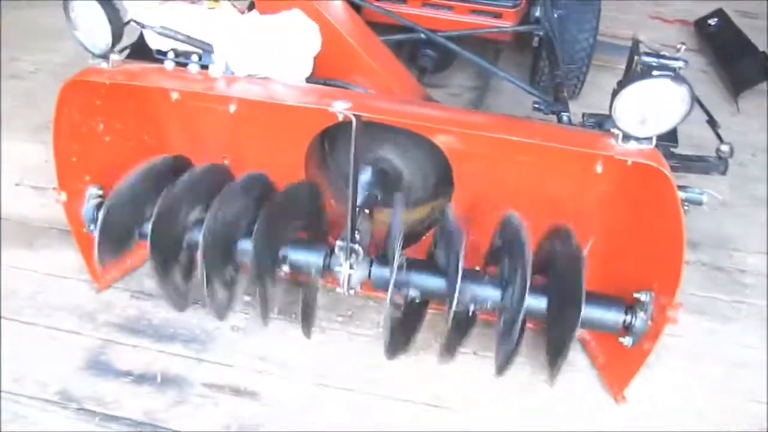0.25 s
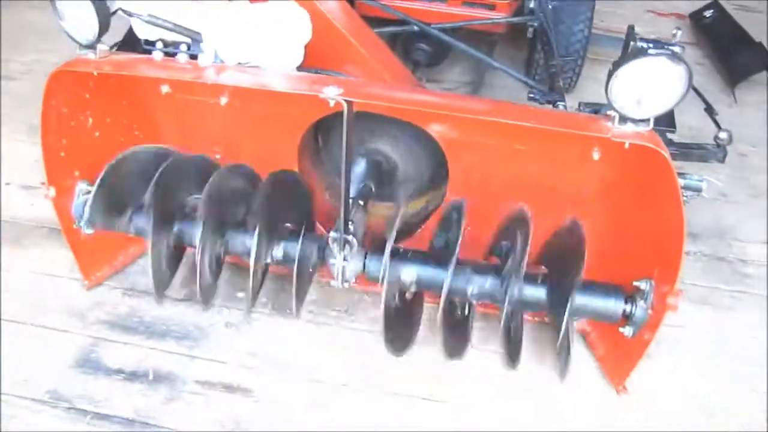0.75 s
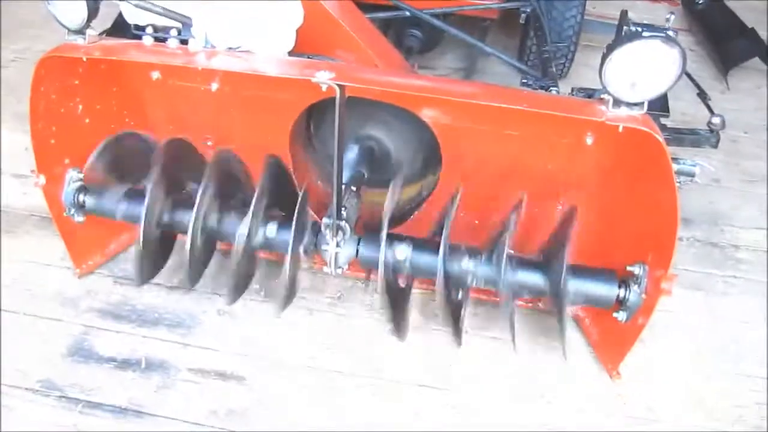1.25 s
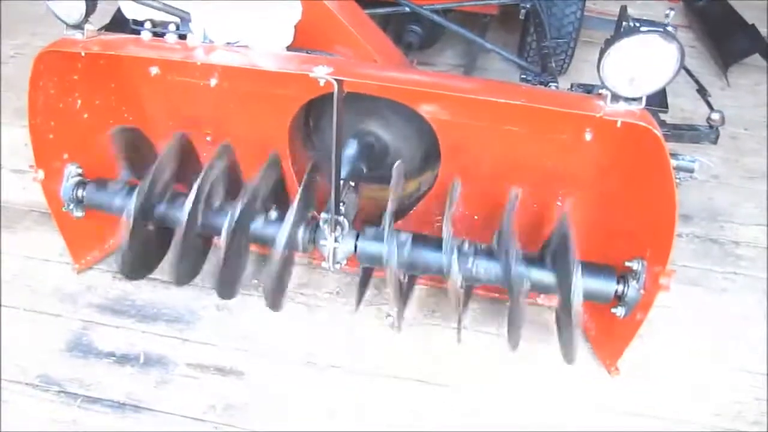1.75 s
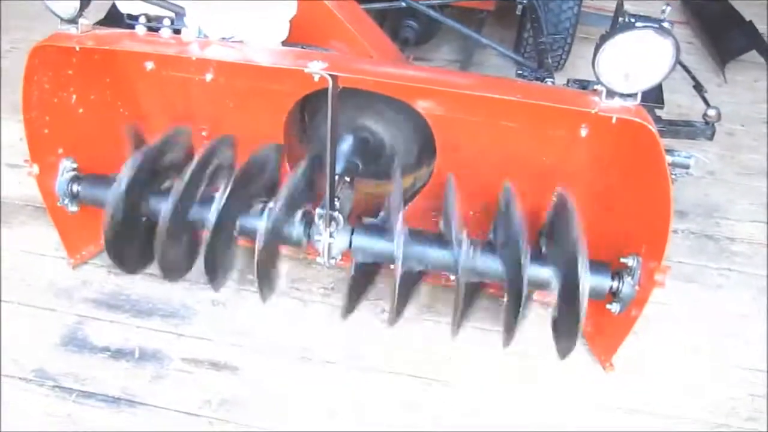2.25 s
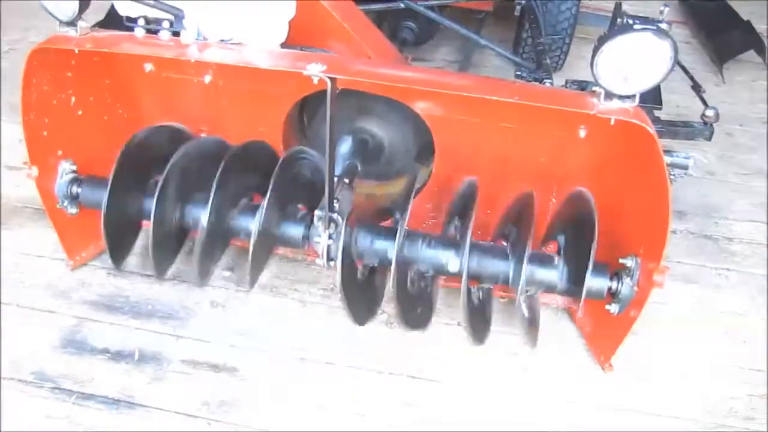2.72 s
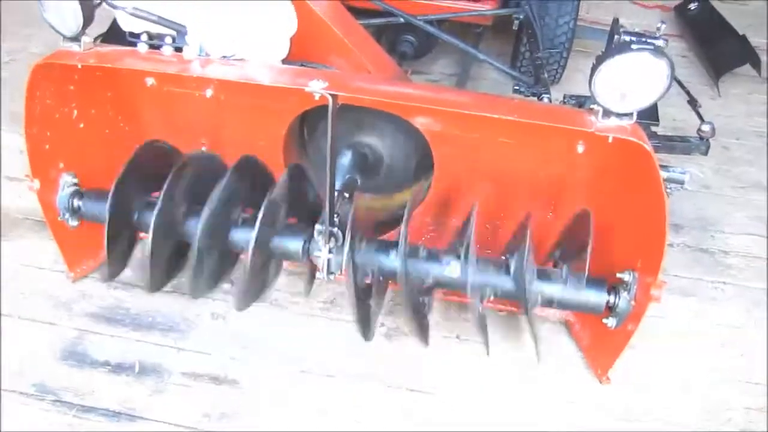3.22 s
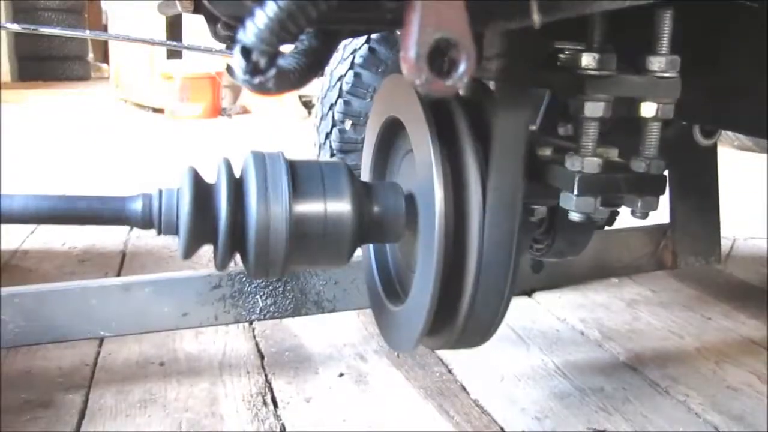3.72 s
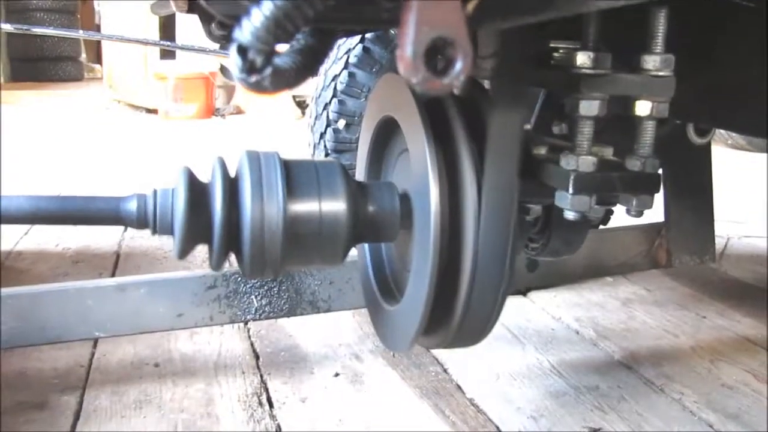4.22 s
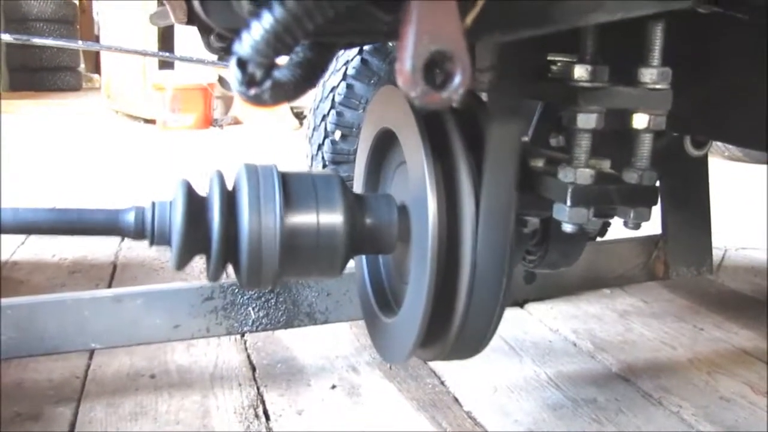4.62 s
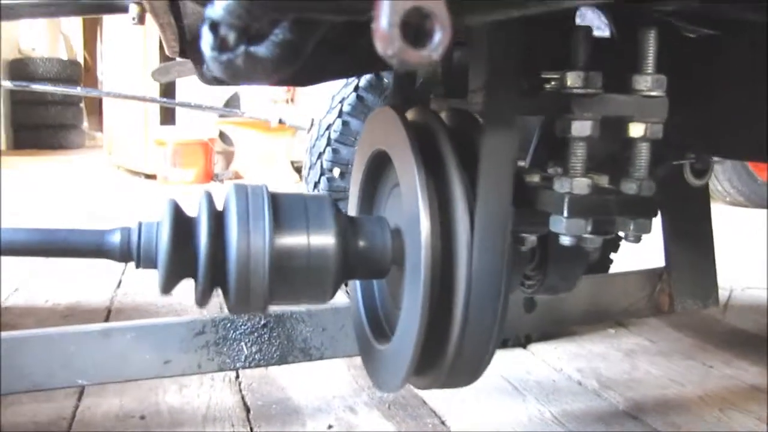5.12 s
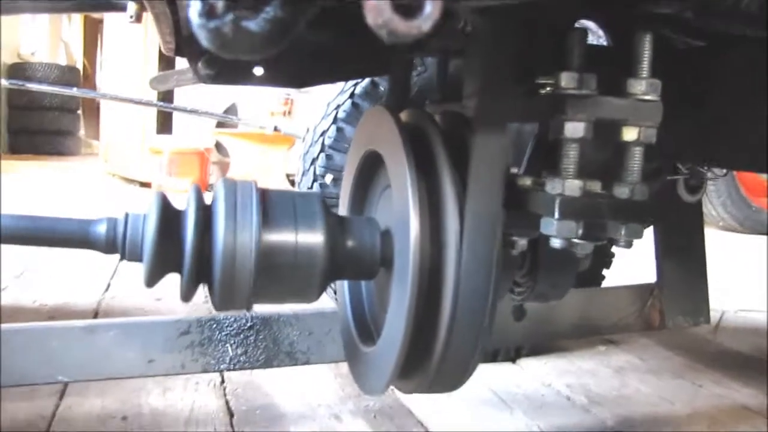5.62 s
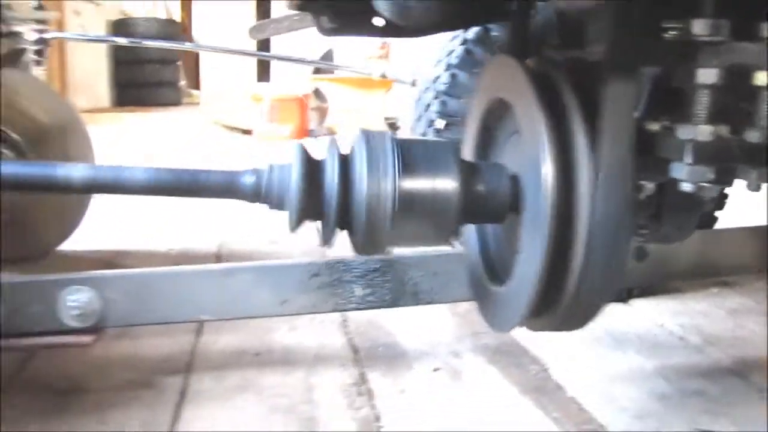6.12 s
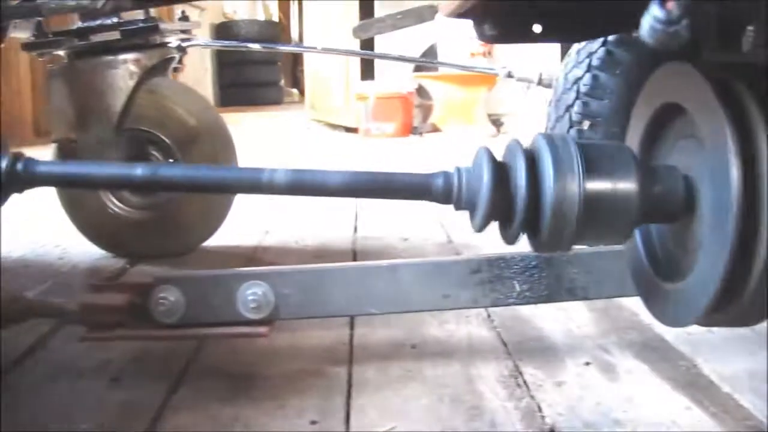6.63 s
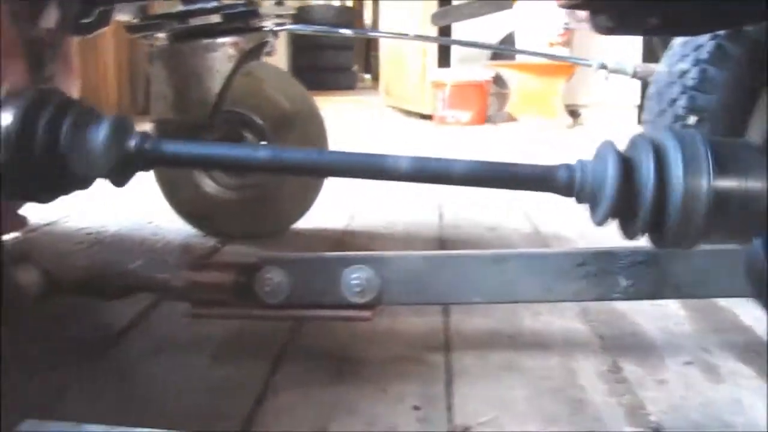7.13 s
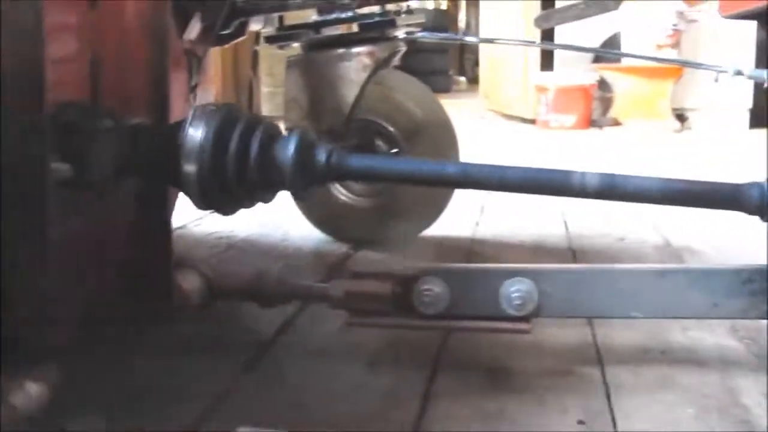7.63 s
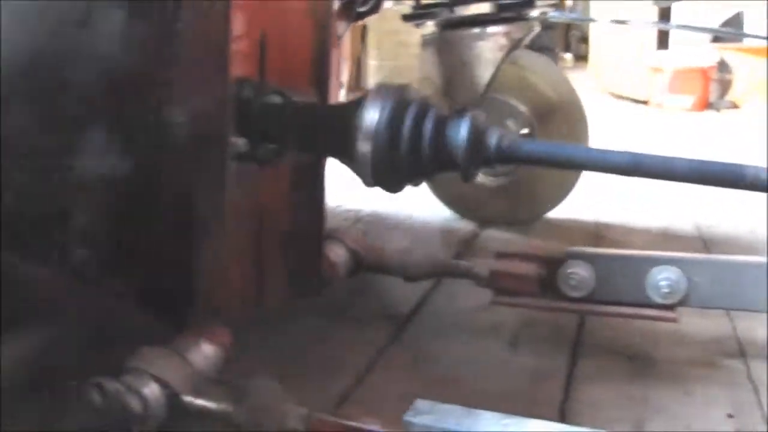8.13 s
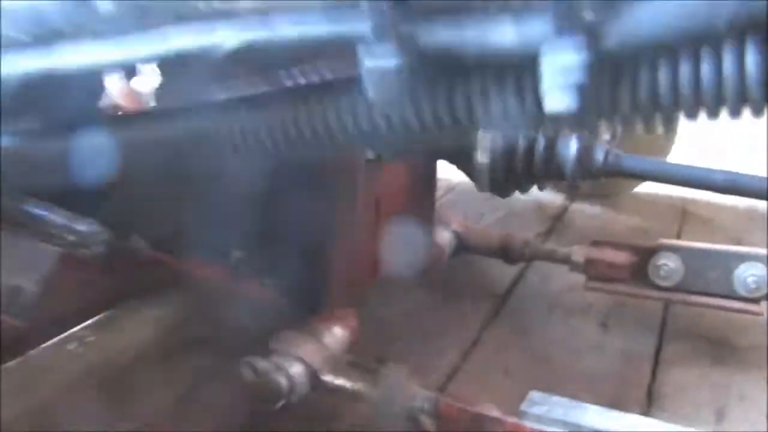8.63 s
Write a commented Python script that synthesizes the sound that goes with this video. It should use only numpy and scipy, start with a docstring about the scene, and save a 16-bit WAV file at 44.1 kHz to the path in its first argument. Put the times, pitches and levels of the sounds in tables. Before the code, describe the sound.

From 0 s, a small twin-cylinder tractor engine runs fast and steady in a shed, heard from in front of a snowblower. Low buzzing exhaust and impeller hum mix with rushing air, loose metal rattle and faint whine. The auger clanks and scrapes roughly four or five times a second, with harder drops near 0.1, 0.7 and 2.2 s. Everything fades from the start, stopping near 3.15 s. After a brief silence, at about 3.3 s, close sound from under the frame fades in, rising until about 6.7 s: heavier exhaust thud, airy rush, clatter, ticking valves, rapid high belt chirps and a fan whine near 2 kHz. The whine swells around 4, 5.8 and 7.5 s, wandering from left to right. From 6 to 8 s the microphone creeps from pulley to shaft joint; belt chirps weaken and housing rattle grows. The engine is still running at the end, about 9 s.

```python
"""A twin-cylinder garden tractor engine in a shed drives a snowblower through a belt and shaft.
Firing pulses ring a muffler; impeller and fan tones follow the crank; shaped noise gives air, rattle and knocks.
In front, the slow auger clanks on every turn, and the sound fades steadily from the start.
After a moment of silence the sound under the frame fades in, with strong exhaust thud, belt chirp and fan whine."""
import sys
import numpy as np
from scipy import signal
from scipy.fft import rfft, irfft, next_fast_len
from scipy.io import wavfile
from scipy.ndimage import uniform_filter1d, map_coordinates

SR = 44100
rng = np.random.default_rng(int(sys.argv[2]) if len(sys.argv) > 2 else 0)


def log_audio(samples):
    """Write samples as a 16-bit WAV file to the path given in sys.argv[1]."""
    # one column per channel
    frames = np.atleast_2d(samples).T
    # limit to full scale, then quantise
    limited = np.clip(frames, -1, 1)
    pcm = np.round(limited * 32767).astype(np.int16)
    wavfile.write(sys.argv[1], SR, pcm)


N = 390726
T = np.arange(N) / SR  # time (s)

BELT_RATIO = .8185  # shaft turns per crank turn
WORM_RATIO = 10  # shaft turns per auger turn
BELT_LAPS = .406  # belt laps per crank turn
FRONT_SET_HZ, UNDER_SET_HZ = 46.413, 46.432  # crank speed outside the surges (turns/s)
WHINE_ORDER, FRONT_WHINE_DB = 42, -60  # strongest fan tone: multiple of crank speed, relative level in front
FRONT_SLOPE_DB_PER_S = 0.77  # slows the fall of the front fade
HARD_CLANK_S = .25  # about one auger turn
# straight ramps; the first is cut short and the second starts late, which leaves a silence
FADE_OUT_END_S, FADE_OUT_CUT_S = 3.363, 3.154
FADE_IN_START_S, FADE_IN_S, FADE_IN_CUT_S = 3.287, 3.39, 3.319
TOP_HZ = 15750  # upper band limit

# muffler response in front, beside the pulley and beside the shaft joint: [f/Hz, level/dB]
FRONT_PIPE = [(20, -46), (46, -21), (93, -19.5), (140, 2.5), (186, -9.5), (233, -12.5), (280, -11.5),
              (326, -26), (380, -21), (520, -20.5), (800, -32), (1500, -34.5), (3000, -55)]
PULLEY_PIPE = [(20, -73), (46, -17), (93, -21), (140, 1.5), (186, -7), (233, -12), (280, -14.5), (326, -15),
               (375, -11), (430, -17), (470, -17), (530, -28.5), (1500, -46), (3000, -50)]
JOINT_PIPE = [(20, -58), (46, -24.5), (93, -15.5), (140, 1), (186, -6), (233, -11.5), (280, -7),
              (326, -20.5), (420, -22.5), (600, -24.5), (750, -37), (1500, -31), (3000, -64)]
# three-bladed impeller: [multiple of shaft speed, front level/dB, under-frame level/dB]
IMPELLER = [(1, -11.5, -17), (2, -13.5, -16.5), (3, 0, 0.5), (5, -0.5, -16), (6, -2, -14.5), (9, -8, -15.5),
            (12, -23.5, -20), (15, -18, -28)]
# noise colour of air rush, engine clatter and valve ticks: [f/Hz, relative level/dB]
FRONT_RUSH = [(20, -22.5), (35, -13), (65, -9), (110, -1), (160, 9.5), (300, -1), (600, 3.5), (900, -3.5),
              (1350, 1), (1700, -1.5), (2050, 0), (2600, -7), (5000, -39)]
UNDER_RUSH = [(20, -9), (35, -2), (65, 3.5), (110, 8.5), (160, 7.5), (280, 3), (600, 0.5), (850, 0.5),
              (1100, -1.5), (1350, 0), (1900, -3), (2600, -9), (5000, -34.5)]
FRONT_CLATTER = [(600, -41), (1800, -9.5), (2700, 0), (3600, -4), (5000, -10.5), (6200, -10), (8000, -19.5),
                 (11000, -24.5), (15500, -42)]
UNDER_CLATTER = [(600, -19), (1800, -9.5), (2500, -0.5), (3600, 0), (4400, -1.5), (5300, -6), (6500, -8),
                 (8000, -14), (11000, -18.5), (15500, -39)]
FRONT_VALVE = [(4000, -39), (6000, -8), (7000, 6.5), (8000, 4.5), (8800, -1), (9700, -1), (11500, -11.5),
               (13000, -13), (15500, -25)]
UNDER_VALVE = [(4000, -23), (6000, 1), (7100, 1.5), (9000, -1), (10500, 0), (11800, -5), (13000, -10),
               (15500, -26)]
# bursts within each crank turn: [place in the turn 0-1, rise time/turns, strength]
FRONT_TICKS = [(0.2, 0.033, 0.85), (0.93, 0.078, 0.18), (0.4, .08, 0.116)]
UNDER_TICKS = [(.12, 0.17, 1), (.8, 0.11, 1)]
FRONT_PUFF = [(.07, 0.03, 0.78)]
UNDER_PUFF = [(0.064, 0.057, 0.38)]
# scrapes within each auger turn: [place in the turn 0-1, f/Hz, width scale/octaves, level/dB, decay/s]
FRONT_KNOCKS = [(.26, 5360, 0.38, -51.5, 0.026), (.92, 4200, 0.56, -50.5, 0.021),
                (0.96, 6050, 0.097, -52.5, 0.027), (.05, 3000, 0.67, -46, 0.0092)]
UNDER_KNOCKS = [(.84, 4600, .15, -53.5, 0.011), (.94, 4500, 0.24, -52, 0.0091)]
# stereo spread of the noises: [f/Hz, side-to-mid level/dB]
FRONT_SIDE = [(60, -1), (380, -20), (950, -18), (2380, -8.5), (6000, -5), (15000, -1.5)]
UNDER_SIDE = [(60, -16), (150, -7.5), (380, -11), (950, -10), (2380, -1), (6000, 1.5), (15000, -0.5)]
# the listening point creeps from pulley to joint: [t/s, share of the way 0-1]
WALK = [(5.8, 0), (6.7, 0.38), (7.4, 0.76), (8.2, 0.99)]
# modes of the blower housing, the auger flights and the engine block: [f/Hz, width/Hz, level/dB]
HOUSING = [(580, 53, 7.5), (1380, 77, -7), (2400, 230, -0.5), (2640, 240, -2), (3270, 250, -4.5),
           (4650, 120, -10)]
FLIGHTS = [(640, 160, -5), (1360, 300, -1), (2600, 81, 1), (2880, 81, 2), (3160, 140, -2.5),
           (3210, 110, -1), (3740, 180, -4.5), (4580, 220, -6.5), (6100, 520, -12)]
BLOCK = [(1300, 200, 4), (1650, 440, 3), (3250, 500, -14)]
# belt chirp: [t/s, f/Hz, level/dB]
BELT = [(3.4, 5930, -56), (4.3, 5950, -55.5), (5.8, 5840, -63), (6.3, 6070, -54.5), (7, 6370, -59.5),
        (7.5, 6440, -67)]
# worn spots on the belt: [place in the lap 0-1, rise time/laps, strength]
BELT_SPOTS = [(0, 0.04, 1), (.37, 0.064, 0.56)]
# smooth departures from the set speed: [middle t/s, length/s, extra speed/(turns per s)]
FRONT_SURGES = [(1.357, 1.677, .167), (2.791, .979, .23)]
UNDER_SURGES = [(4.142, 2.211, .24), (5.777, 1.422, .511), (7.711, 1.887, .546), (8.469, .666, -.18)]
# relative level of each part: [front level/dB, pulley level/dB, joint level/dB]
EXHAUST_DB = (-44.4, -33, -33)
IMPELLER_DB = (-53.5, -38.5, -38)
RUSH_DB = (-47, -41, -41.5)
CLATTER_DB = (-53, -48.5, -51.5)
VALVE_DB = (-63.5, -56, -58.5)
# swaying toward and away from the engine, under the frame: [t/s, added level/dB]
CLOSENESS = [(3.5, 1.1), (6.1, -1), (7.6, 0.7), (8.8, -.6)]
# fan tones: [multiple of crank speed, front level/dB, pulley level/dB, joint level/dB,
#             level change/dB per extra turn/s, left-right level/dB]
FAN_TONES = [(20, -64, -57.5, -55.5, 2, 4), (38, -68, -55.5, -59.5, 8.5, -4), (40, -68, -53, -59, -15, 3),
             (46, -64.5, -57.5, -61, 10.5, -13)]
# loud spots of the fan's standing waves, passed under the frame:
# [middle t/s, length/s, multiple of crank speed, level/dB, left-right level/dB, lag between ports/rad]
LOUD_SPOTS = [(4.1, 3.1, 42, -47.5, 16, 0.76), (5.75, 2.1, 42, -43.5, 4.5, 2.4),
              (6.701, 1.6, 42, -51.5, 0, 2.15), (7.316, 1.03, 42, -44, 0, .6),
              (7.4, 2.4, 20, -54.5, 0, 0.45), (7.72, 0.91, 42, -42.5, -18, 1.1),
              (8.85, 0.75, 42, -51.5, -12, .9)]
# harder drops of the auger: [t/s, extra level/dB]
HARD_CLANKS = [(.14, 6), (.66, 2), (2.24, 4)]


def amp(db):
    """Level: decibels converted to an amplitude ratio."""
    return 10 ** (np.asarray(db) / 20)


def unit(x):
    """Normalisation: the signal scaled to rms 1."""
    return x / np.sqrt(np.mean(x ** 2) + 1e-20)


def along(points, hz):
    """Interpolation of (f/Hz, value) points on a logarithmic frequency axis."""
    f, v = np.transpose(points)
    return np.interp(np.log(hz + 1), np.log(f + 1), v)


def curves(rows):
    """Linear interpolation in time: one curve for each column after t/s."""
    s, *cols = np.transpose(rows)
    return [np.interp(T, s, c) for c in cols]


def wobble(rate):
    """Slow random modulation: a smooth curve through rate random knots a second."""
    knots = rng.standard_normal(int(N * rate / SR) + 4)
    return map_coordinates(knots, [T * rate])


def swell(middle, length):
    """Raised-cosine envelope: one smooth rise and fall, 0 to 1 to 0."""
    return np.cos(np.pi * np.clip((T - middle) / length, -.5, .5)) ** 2


def filtered(x, response):
    """Linear filtering: the spectrum multiplied by a response of frequency."""
    m = next_fast_len(N + SR // 2)
    spectrum = rfft(x, m) * response(np.fft.rfftfreq(m, 1 / SR))
    return irfft(spectrum, m)[..., :N]


def ringing(spectrum_db, size=8192):
    """Minimum phase: the causal impulse response with this magnitude, by folding the cepstrum."""
    magnitude = amp(along(spectrum_db, np.fft.rfftfreq(size, 1 / SR)))
    cepstrum = irfft(np.log(magnitude))
    cepstrum[1:size // 2] *= 2
    cepstrum[size // 2 + 1:] = 0
    return irfft(np.exp(rfft(cepstrum)))


def resonances(modes):
    """Modal summation: the colour in dB of several damped resonances, added in power."""
    def colour_db(f):
        power = 0
        for hz, width, db in modes:
            detuning = (f * f - hz * hz) / ((f + 1) * width)
            power = power + amp(db) ** 2 / (1 + detuning ** 2)
        return 10 * np.log10(power)
    return colour_db


def noise(colour_db, spread, gate=1):
    """Mid-side stereo: gated noise coloured by a function of frequency; its mid has rms 1."""
    def shape(hz):
        mid_db = colour_db(hz)
        return amp([mid_db, mid_db + along(spread, hz)])
    mid, side = filtered(gate * rng.standard_normal((2, N)), shape)
    return np.array([mid + side, mid - side]) / np.std(mid)


def scatter(turns, scatter_db):
    """Cycle-to-cycle variation: a new random gain for every whole turn."""
    index = np.floor(turns - np.floor(turns.min())).astype(int)
    return amp(scatter_db * rng.standard_normal(index.max() + 1))[index]


def bursts(turns, rows, scatter_db):
    """Cyclic excitation: quick rises with slower decays at fixed places in every turn."""
    out = 0
    for place, rise, strength in rows:
        age = (turns - place) % 1 / rise
        out = out + strength * scatter(turns - place, scatter_db) * age * np.exp(1 - age)
    return out


def blows(turns, place, decay):
    """Impact envelope: a fast onset and exponential decay once a turn, each a little different."""
    age_s = (turns - place) % 1 / np.gradient(turns) / SR
    strength = scatter(turns - place, scatter_db=1.3)
    return strength * np.exp(-age_s / decay) * (1 - np.exp(-age_s / .0008))


def placed(pan_db, lag):
    """Stereo cues: complex gain of a tone at two ports, from a level difference and phase lag."""
    sides = np.array([[.5], [-.5]])
    gains = amp(sides * pan_db)
    return gains / gains.mean() * np.exp(-1j * sides * lag)


def crank_rotation(set_hz, surges, start_turns):
    """Phase is the integral of speed: crank turns, and the speed above the set speed."""
    extra_hz = sum(size * swell(middle, length) for middle, length, size in surges)
    return start_turns + np.cumsum(set_hz + extra_hz) / SR, extra_hz


def exhaust(crank, pipe, place, scatter_db, uneven, chamber_hz=480):
    """Impulse excitation of a resonator: one firing a turn, cylinders alternating, rings the muffler."""
    firing = np.floor(crank - place)
    onsets = np.diff(firing, prepend=firing[0])
    cylinder = 1 + uneven * (-1) ** firing
    pulses = onsets * scatter(crank - place + .5, scatter_db) * cylinder
    thuds = signal.fftconvolve(pulses, ringing(pipe + [(8000, -120)]))[:N]
    # an all-pass chamber spreads each pulse in time, which rounds the thud
    return -unit(filtered(thuds, lambda f: (chamber_hz - 1j * f) / (chamber_hz + 1j * f)))


def impeller(shaft, levels_db, waver_db):
    """Blade-passing tones: a wavering harmonic series on the belt-driven shaft speed."""
    out = 0
    for row, db in zip(IMPELLER, levels_db):
        gain = amp(db + waver_db * wobble(7))
        out = out + gain * np.sin(2 * np.pi * (round(row[0]) * shaft + rng.random()))
    return np.sqrt(2) * out


def machinery(crank, spread, rush, clatter, valve, puff, ticks, gains_db, puff_depth, grain_db, tick_floor):
    """Periodically modulated noise: rushing air puffs, loose metal rattles and valves tick with the crank."""
    puffs = bursts(crank, puff, scatter_db=2.5)
    jolts = bursts(crank, ticks, scatter_db=4)
    clicks = bursts(crank, ticks, scatter_db=2)
    air = noise(lambda hz: along(rush, hz), spread, 1 + puff_depth * puffs)
    rattle_gate = amp(grain_db * wobble(450)) * (1 + 0.54 * jolts)
    rattle = noise(lambda hz: along(clatter, hz), spread, rattle_gate)
    tap_gate = amp(grain_db * wobble(900)) * (tick_floor + clicks)
    taps = noise(lambda hz: along(valve, hz), spread, tap_gate)
    return sum(amp(db) * layer for db, layer in zip(gains_db, (air, rattle, taps)))


def auger(shaft, knocks, spread):
    """Speed reduction: the worm gear turns the auger slowly, and it scrapes at fixed places in each turn."""
    out = np.zeros((2, N))
    for place, hz, octaves, db, decay in knocks:
        def colour_db(f):
            distance = np.log2((f + 1) / hz) / (2 * octaves)
            return -40 * np.log10(1 + distance ** 2)
        steel = noise(colour_db, spread)
        out += amp(db) * blows(shaft / WORM_RATIO, place, decay) * steel
    return out


def clank(shaft, place, level_db, decay, ragged_db=3):
    """Backlash impact: once a turn the auger drops through its play, chatters, and the flights ring."""
    chatter = unit(amp(ragged_db * wobble(130)))
    force_db = level_db + sum(db * swell(s, HARD_CLANK_S) for s, db in HARD_CLANKS)
    drop = blows(shaft / WORM_RATIO, place, decay)
    return amp(force_db) * drop * chatter * noise(resonances(FLIGHTS), FRONT_SIDE)


def reflections(x, depth_db):
    """Multipath interference: frame and floor shape the treble into slowly shifting peaks at each port."""
    hz, _, z = signal.stft(x, SR, nperseg=1024)
    field = uniform_filter1d(rng.standard_normal(z.shape), size=3, axis=1)  # smooth over frequency
    field = unit(uniform_filter1d(field, size=70, axis=2))  # smooth over time
    # full depth above 2 kHz, less below
    gain = amp(depth_db * np.clip(hz / 2000, 0, 1)[:, None] * field)
    # partly even out the mean power across frequency
    gain /= np.sqrt(np.mean(gain ** 2, axis=(0, 2), keepdims=True)) ** .5
    return signal.istft(z * gain, SR, nperseg=1024)[1][:, :N]


def whine(crank, order, ports, waver_db, flutter):
    """Order-locked tone: a fan tone follows the crank; reflections shift its strength at each port."""
    phase = 2 * np.pi * (round(order) * crank + rng.random())
    phase = phase + flutter * order / WHINE_ORDER * wobble(40)
    shifting = amp(waver_db * np.array([wobble(3.04), wobble(2.98)]))
    return np.sqrt(2) * shifting * np.imag(ports * np.exp(1j * phase))


def front():
    """Superposition in front: facing the auger, with the engine behind the housing."""
    crank, _ = crank_rotation(FRONT_SET_HZ, FRONT_SURGES, start_turns=.014)
    shaft = BELT_RATIO * crank
    hum = amp(EXHAUST_DB[0]) * exhaust(crank, FRONT_PIPE, place=0.058, scatter_db=1.0, uneven=.03)
    hum += amp(IMPELLER_DB[0]) * impeller(shaft, [row[1] for row in IMPELLER], waver_db=2.0)
    works = machinery(crank, FRONT_SIDE, FRONT_RUSH, FRONT_CLATTER, FRONT_VALVE, FRONT_PUFF, FRONT_TICKS,
                      (RUSH_DB[0], CLATTER_DB[0], VALVE_DB[0]),
                      puff_depth=0.37, grain_db=1.1, tick_floor=.13)
    works += auger(shaft, FRONT_KNOCKS, FRONT_SIDE)
    works += clank(shaft, place=.465, level_db=-44, decay=0.029)
    tones = [row[:2] for row in FAN_TONES] + [(WHINE_ORDER, FRONT_WHINE_DB)]
    fan = sum(amp(db) * whine(crank, order, placed(0, lag=.4), waver_db=1.5, flutter=.55)
              for order, db in tones)
    balance = amp([[.6], [-.6]])  # slightly to the left
    return amp(FRONT_SLOPE_DB_PER_S * T) * (hum + reflections(works, depth_db=2.3) + fan) * balance


def on_the_way(levels_db, way):
    """Level against position: linear in dB from the pulley to the joint."""
    *_, pulley_db, joint_db = levels_db
    return pulley_db + way * (joint_db - pulley_db)


def belt(crank, width_hz):
    """Friction squeal: a narrow noise band chirps as the belt's worn spots pass the pulley groove."""
    hz, db = curves(BELT)
    carrier = np.exp(2j * np.pi * np.cumsum(hz) / SR)
    ports = []
    for _ in range(2):
        envelope = wobble(width_hz) + 1j * wobble(width_hz)
        ports.append(unit(np.real(carrier * envelope)))
    spots = unit(0.11 + bursts(BELT_LAPS * crank, BELT_SPOTS, scatter_db=4.0))
    return amp(db) * np.array(ports) * spots


def camshaft(crank, level_db, place, decay):
    """Half-order impact: a knock at half the crank speed rings the engine block."""
    return amp(level_db) * blows(crank / 2, place, decay) * noise(resonances(BLOCK), UNDER_SIDE)


def housing_rattle(way):
    """Modal noise: the blower housing rattles unevenly, and is heard only from near the joint."""
    return amp(-48.0 + 2.0 * wobble(90)) * way ** 3 * noise(resonances(HOUSING), UNDER_SIDE)


def loud_spots(order):
    """Standing waves: what the antinodes of one fan tone add at the two ports."""
    return sum(amp(db) * swell(middle, length) * placed(pan_db, lag)
               for middle, length, multiple, db, pan_db, lag in LOUD_SPOTS
               if abs(multiple / order - 1) < .03)


def fan_close(crank, extra_hz, way):
    """Speed-dependent tones: weaker fan tones rise or fall with surges; the strongest has loud spots only."""
    out = whine(crank, WHINE_ORDER, loud_spots(WHINE_ORDER), waver_db=1.0, flutter=0.24)
    for order, *levels_db, surge_db, pan_db in FAN_TONES:
        level_db = on_the_way(levels_db, way) + surge_db * extra_hz
        ports = amp(level_db) * placed(pan_db, lag=1.0) + loud_spots(order)
        out += whine(crank, order, ports, waver_db=2.0, flutter=0.27)
    return out


def under():
    """Superposition under the frame: beside the pulley and drive shaft, beneath the engine."""
    crank, extra_hz = crank_rotation(UNDER_SET_HZ, UNDER_SURGES, start_turns=.465)
    shaft = BELT_RATIO * crank
    way = np.clip(curves(WALK)[0], 0, 1)
    closeness_db = curves(CLOSENESS)[0]
    parts = (EXHAUST_DB, IMPELLER_DB, RUSH_DB, CLATTER_DB, VALVE_DB)
    exhaust_db, impeller_db, *works_db = [on_the_way(part, way) + closeness_db for part in parts]
    at_pulley, at_joint = [exhaust(crank, pipe, place=0.98, scatter_db=0.4, uneven=0.021)
                           for pipe in (PULLEY_PIPE, JOINT_PIPE)]
    hum = amp(exhaust_db) * ((1 - way) * at_pulley + way * at_joint)
    hum += amp(impeller_db) * impeller(shaft, [row[2] for row in IMPELLER], waver_db=0.5)
    works = machinery(crank, UNDER_SIDE, UNDER_RUSH, UNDER_CLATTER, UNDER_VALVE, UNDER_PUFF, UNDER_TICKS,
                      works_db, puff_depth=0.18, grain_db=0.25, tick_floor=0.05)
    works += auger(shaft, UNDER_KNOCKS, UNDER_SIDE)
    works += belt(crank, width_hz=320)
    works += camshaft(crank, level_db=-45.0, place=0.097, decay=0.0022)
    works += housing_rattle(way)
    balance = amp([[.8], [-.8]])  # hum slightly to the left
    return hum * balance + reflections(works, depth_db=2) + fan_close(crank, extra_hz, way)


def scene():
    """Linear fades: the front sound falls to a moment of silence, then the under-frame sound rises."""
    fade_out = (1 - T / FADE_OUT_END_S) * (T < FADE_OUT_CUT_S)
    fade_in = np.clip((T - FADE_IN_START_S) / FADE_IN_S, 0, 1) * (T > FADE_IN_CUT_S)
    return fade_out * front() + fade_in * under()


def record(dry):
    """Band limiting: a 100 Hz wide ramp down to nothing at the upper limit."""
    return filtered(dry, lambda hz: np.clip((TOP_HZ - hz) / 100, 0, 1))


dry = scene()
out = record(dry)
log_audio(out)
```